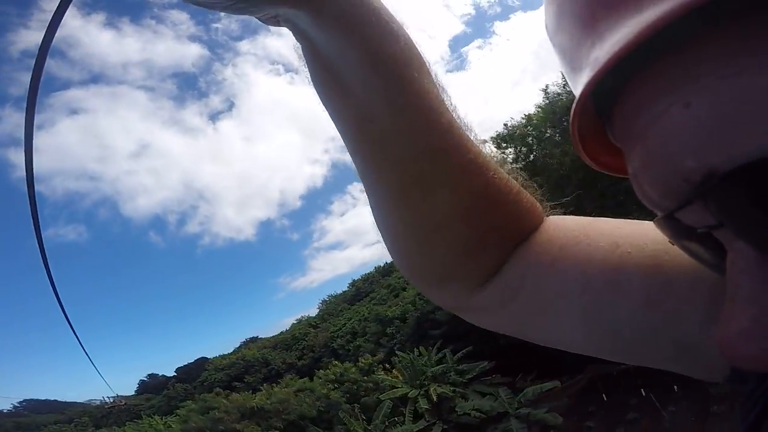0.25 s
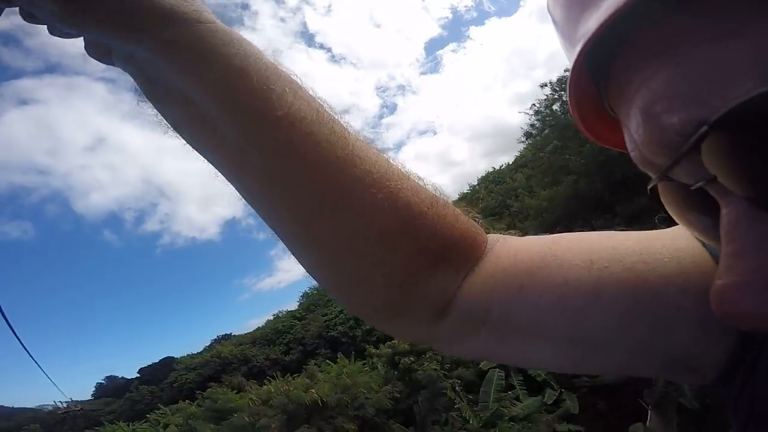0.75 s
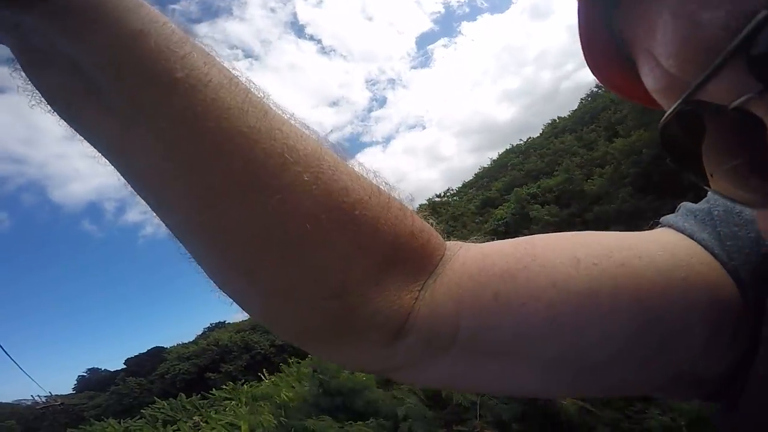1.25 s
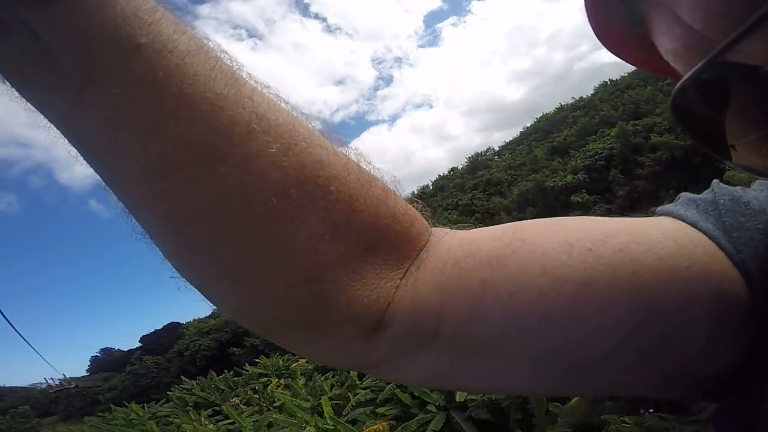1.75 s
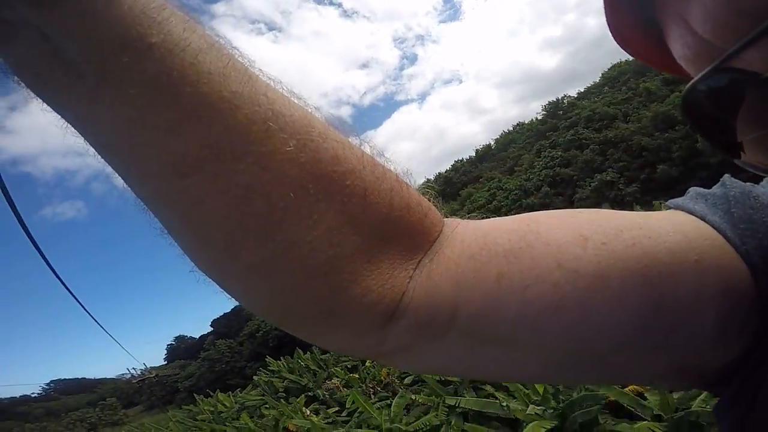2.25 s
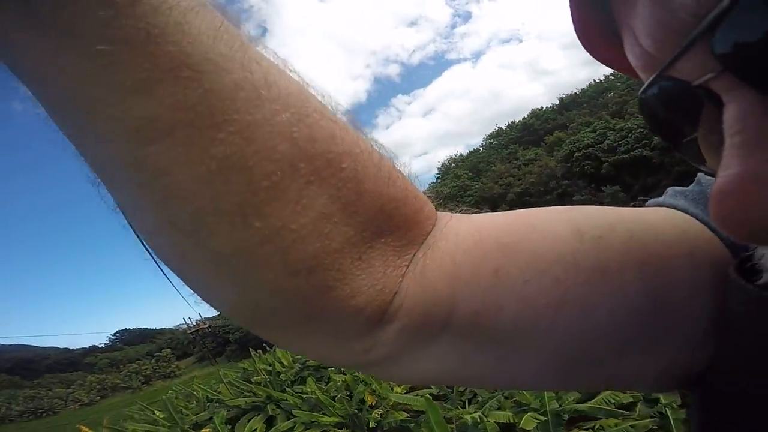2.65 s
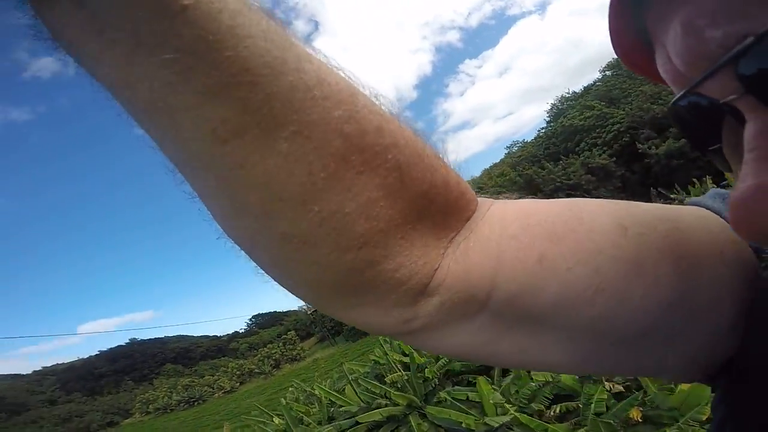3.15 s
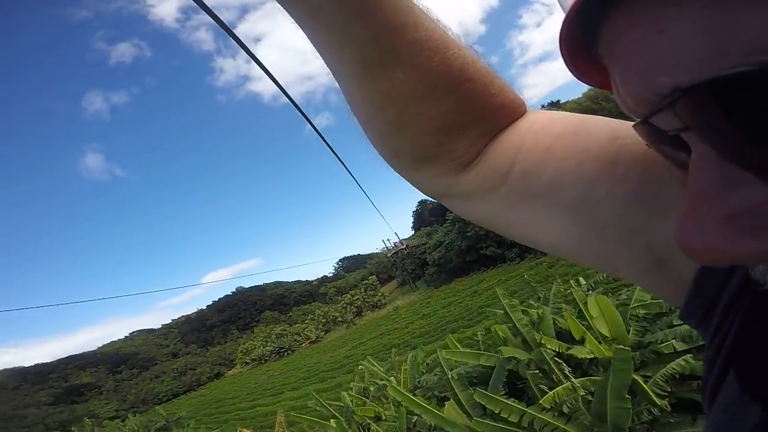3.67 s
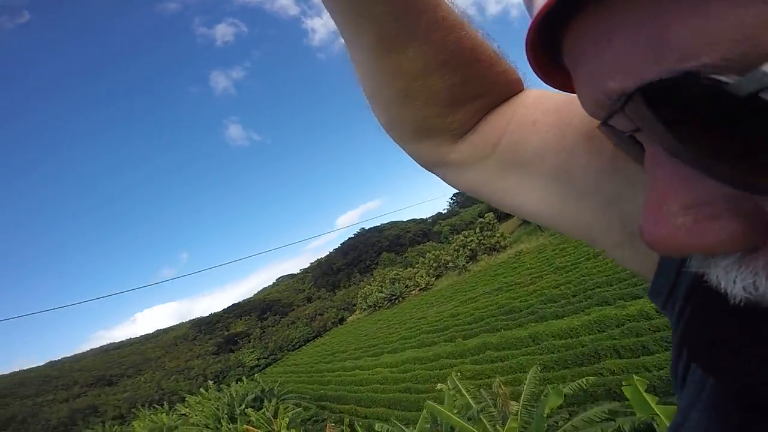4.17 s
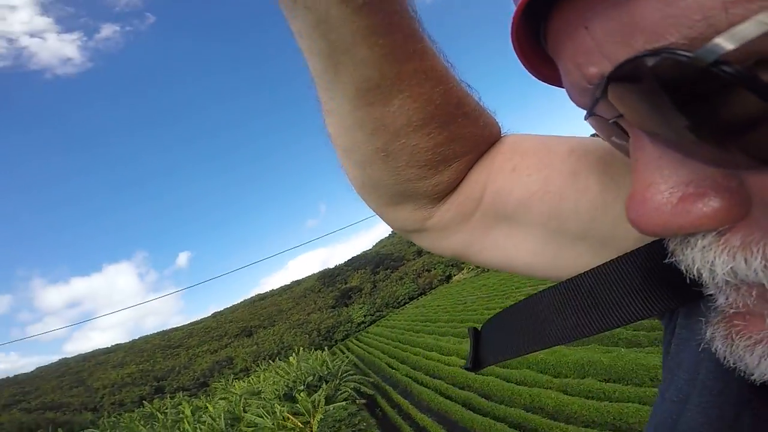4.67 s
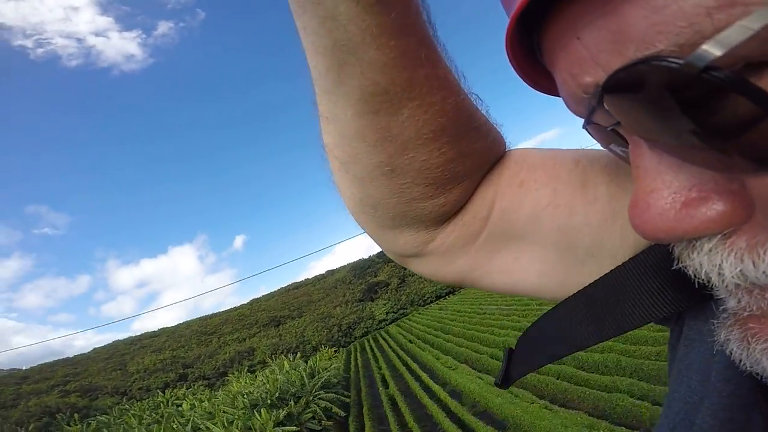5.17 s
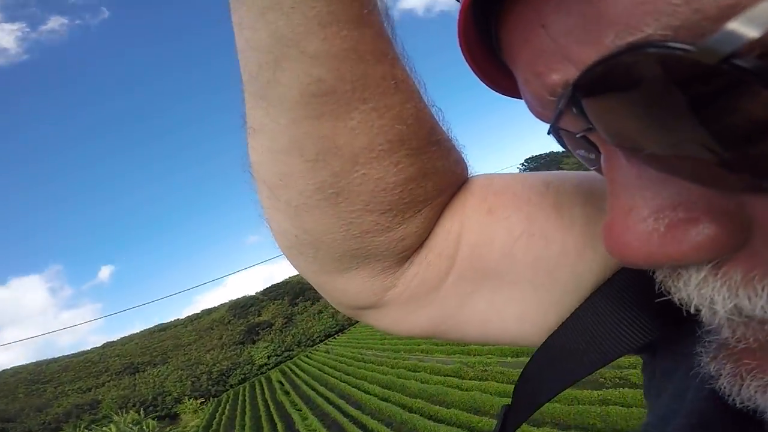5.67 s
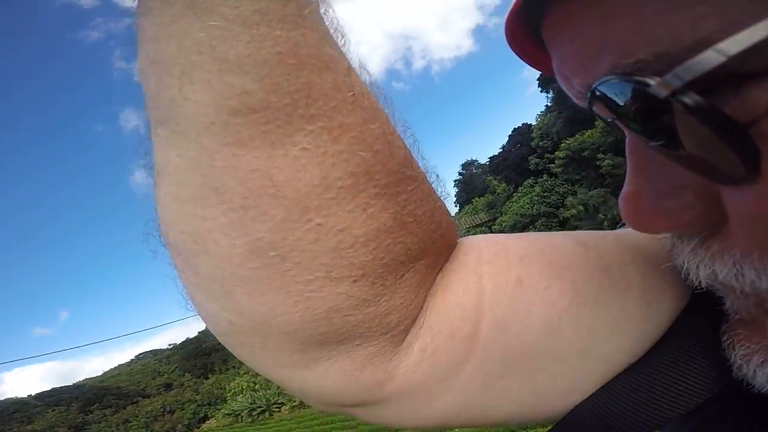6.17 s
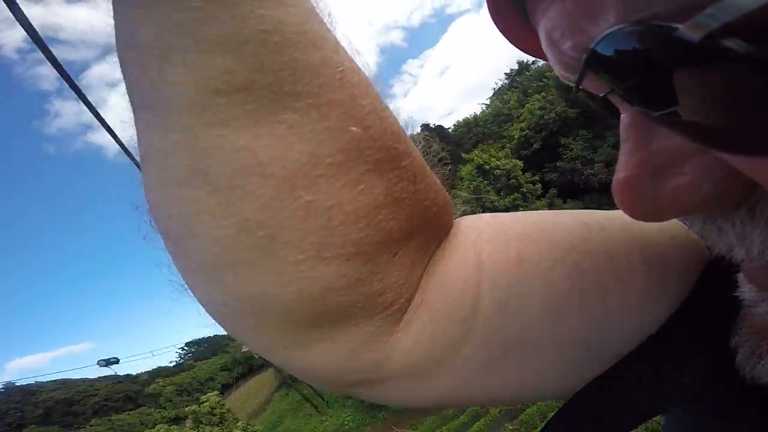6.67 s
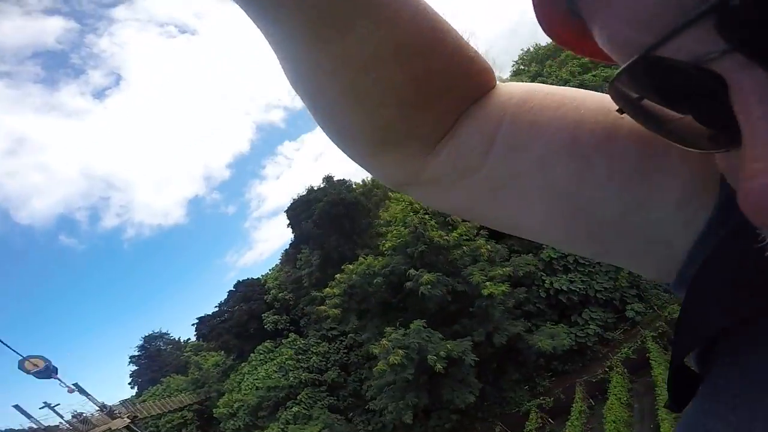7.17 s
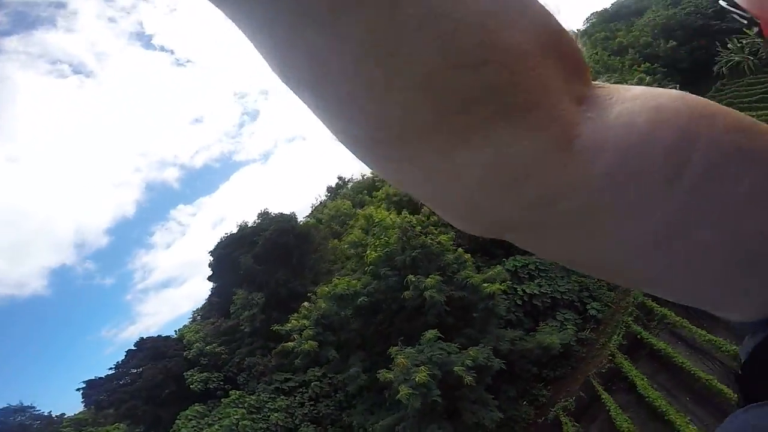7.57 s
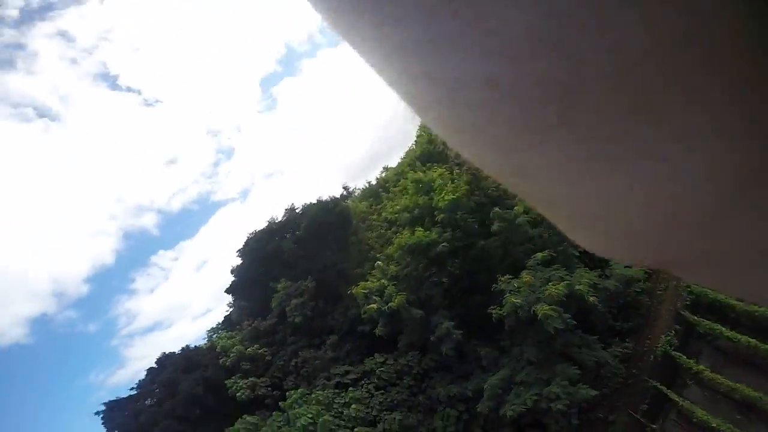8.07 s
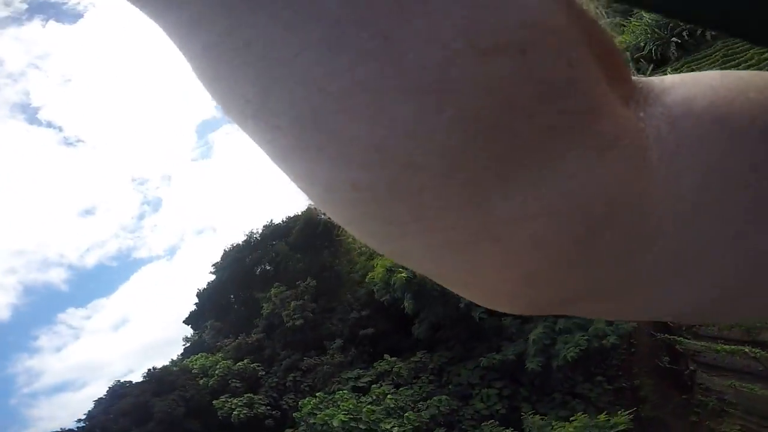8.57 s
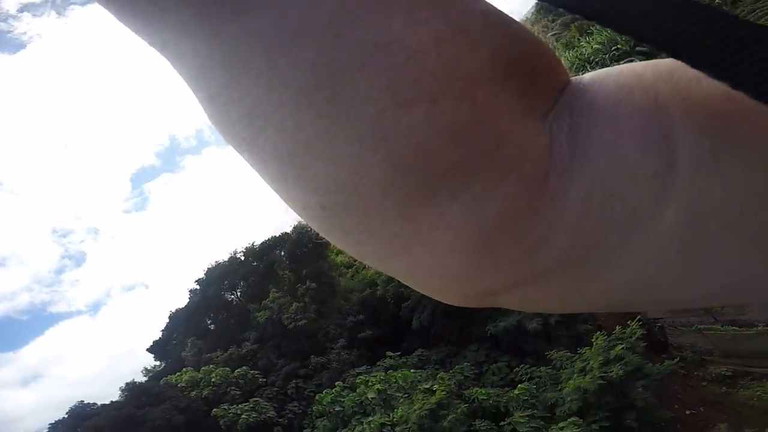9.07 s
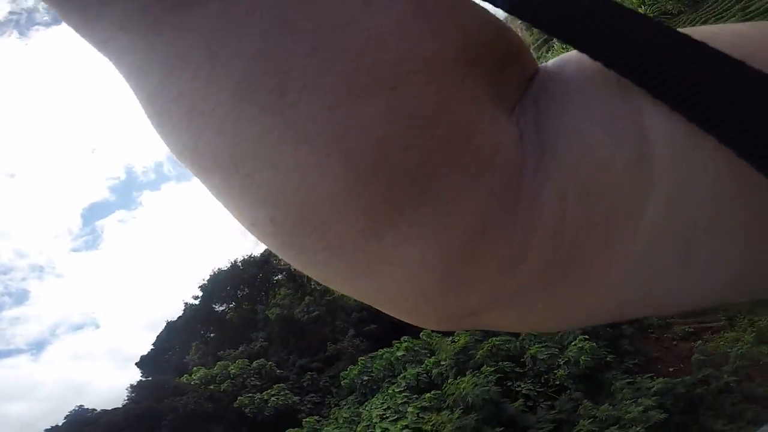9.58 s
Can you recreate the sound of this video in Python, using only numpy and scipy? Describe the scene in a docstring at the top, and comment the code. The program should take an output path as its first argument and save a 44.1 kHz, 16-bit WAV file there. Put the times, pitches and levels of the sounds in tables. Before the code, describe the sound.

Bright metallic rolling rush of a cable trolley with deep wind rumble, ending in a short brake scrape, a violent clack and scattered clunks.

```python
"""Trolley ride down a steel cable

Rough wire shakes the trolley's frame, the wheels whine over the strands, and single resonances sing out.
The trolley meets the brake block, which scrapes and jolts; knocks ring the microphone's housing.
At the stop the riding sounds drop in level, then slowly come back; the slack cable hums near the end.
Behind it all, wind buffets the microphone.
Rings are resonances or fading sines, rubbing and wind are shaped noise, whine and hum are sines.
"""
import sys
import numpy as np
from scipy import signal
from scipy.fft import rfft, irfft
from scipy.io import wavfile
from scipy.ndimage import uniform_filter1d

SR = 44100
rng = np.random.default_rng(int(sys.argv[2]) if len(sys.argv) > 2 else 0)


def to_wav(s):
    """Save 16-bit WAV."""
    ch = np.atleast_2d(s).T  # columns
    pcm = np.round(np.clip(ch, -1, 1) * 32767)  # PCM
    wavfile.write(sys.argv[1], SR, pcm.astype(np.int16))


N = 433503   # length in samples

# Loudness of the rolling, before the drop in level at the stop: (time [s], level [dB])
ROLLING_LEVEL = [(0.0, -21.5), (1.12, -19), (2.4, -22.5), (2.77, -20), (3.74, -22.5), (4.3, -21.5),
                 (4.9, -20), (5.32, -18.5), (5.85, -21.5), (6.5, -21), (7.11, -23), (7.76, -23)]
# Resonances of strap, plates, axles, wheels, clip and rims, one list a part:
# (pitch [Hz], width before widening [Hz], level within the part [dB])
FRAME_PARTS = [
    [(1640, 435, -6), (2030, 770, -6), (2350, 240, 0.5)],
    [(2730, 240, 0.5), (2913, 120, 2.5), (2555, 330, -2)],
    [(3482, 89, -7.5), (4034, 168, -2), (4225, 94, -1), (4620, 350, -4.5), (5206, 260, -7)],
    [(5616, 150, 3.5), (6214, 680, 0.5), (6720, 300, -12)],
    [(7420, 440, 4), (8280, 190, 0.5), (8650, 500, 1), (7130, 250, 0)],
    [(10670, 830, 11.5), (8750, 1800, -15), (12460, 390, 3.5), (13200, 730, 1), (15500, 1300, -1.5)],
]
# Narrow dips cut into the rolling: (pitch [Hz], width [Hz], depth [dB])
ROLLING_DIPS = [(3250, 200, -10), (3730, 160, -9), (5350, 150, -6), (5900, 110, -8)]


def rolling(flicker_db, swell_db):
    """Rough wire shakes every resonance; each swells on its own, a wobbling wheel flickers them all."""
    out = 0
    wobble_db = flicker_db * drift(40)
    shakes = rng.standard_normal((2, N))   # neighbouring resonances move unrelated
    for share_db, modes in zip(facing(), FRAME_PARTS):
        part = 0
        for k, (hz, width_hz, db) in enumerate(sorted(modes)):
            ring = narrow(shakes[k % 2], hz, 1.5 * width_hz)
            part = part + from_db(db + swell_db * drift(2.4)) * ring
        out = out + from_db(share_db + wobble_db) * rms_one(part)
    for hz, width_hz, depth_db in ROLLING_DIPS:
        out = out - (1 - from_db(depth_db)) * resonance(out, hz, width_hz)
    return from_db(*in_time(ROLLING_LEVEL)) * out


# The rider turns and other parts face the microphone; each row holds until the next:
# (time [s], then level [dB] of strap, plates, axles, wheels, clip, rims, wind flutter, wind rush, wind hiss)
RIDER_TURNS = [(0, -15, -7.5, -3.5, -5.5, -13, -10.5, 0, 1.5, -1),
               (1.9, -11, -6.5, -6, -6, -11, -8, 3.5, 0.5, -3),
               (2.63, -11, -8, -6, -7, -10, -6, 1.5, 0, -2.5),
               (3.28, -11, -6.5, -6, -7, -14.5, -12.5, 0.5, 0.5, -3.5),
               (3.8, -13, -8, -6, -5.5, -17, -10, 3.5, 0.5, -4.5),
               (4.419, -13.5, -12, -4, -4.5, -14, -10, 1, -5.5, -10),
               (5.93, -18.5, -8, -9.5, -11.5, -19, -13.5, -3, 1, -4),
               (6.85, -17.5, -8.5, -10, -11, -20, -14.5, -3, -1, -5),
               (7.9, -4, -6, -2, -5.5, -15, -12, -7, 1, -6),
               (8.75, -5.5, -11, -0.5, -7, -13.5, -13, -12.5, 0.5, -10.5)]
TURN_S = 0.11   # a turn takes this long


def facing():
    """A turn slides each level smoothly from one held value to the next."""
    s, *columns = np.transpose(RIDER_TURNS)
    held = np.searchsorted(s[1:], np.arange(N) / SR)
    return [uniform_filter1d(c[held], size=int(TURN_S * SR), mode="nearest") for c in columns]


# How fast the wheels cross the strands: (time [s], strands per second [Hz])
STRAND_RATE = [(.8, 873), (1.5, 858), (2.2, 830), (2.5, 812), (2.9, 801), (3.2, 765), (4.3, 748),
               (4.5, 726), (5.1, 705), (5.8, 676), (6.3, 660)]
# A multiple of that rate is heard while it crosses one of these: (pitch [Hz], width [Hz], level [dB])
WHINE_RESONANCES = [(1390, 108, -40.5), (1617, 73, -41), (1715, 75, -48), (2135, 80, -44), (2350, 155, -30),
                    (2637, 60, -35)]
# Stretches where the whine fades away: (from [s], to [s]); where from comes after to, the whine only dips a
# little between them
WHINE_SILENT = [(1, 0.73), (3.5, 4.15), (6.15, 11)]
WHINE_FADE_S = 0.17


def whine(waver_hz):
    """Second to fourth multiple of the strand rate, slightly unsteady, heard through resonances they cross."""
    t = np.arange(N) / SR
    per_s = in_time(STRAND_RATE)[0] + waver_hz * drift(32.4)
    heard = np.ones(N)
    for start, end in WHINE_SILENT:
        heard = heard * np.clip(np.maximum(start - t, t - end) / WHINE_FADE_S, 0, 1)
    out = 0
    for multiple in range(2, 5):
        hz = multiple * per_s
        through = 0
        for peak_hz, width_hz, db in WHINE_RESONANCES:
            through = through + from_db(db) / (1 + (2 * (hz - peak_hz) / width_hz) ** 2)
        out = out + through * tone(hz, 0, waver_db=1.5)
    return heard * out


# Single resonances that stand out for a while as rider and gear turn, before the drop in level at the stop:
# (start time [s], end time [s], pitch [Hz], width of each of two passes [Hz], level when fully fed [dB])
SINGING_RESONANCES = [(-.2, 0.56, 870, 130, -38.5), (.1, 1.47, 2750, 149, -29.5),
                      (.9, 3.18, 4100, 199, -30.5), (2.1, 3.3, 696, 200, -37.5),
                      (2.45, 2.7, 2390, 120, -33.5), (3.24, 3.7, 2875, 200, -28),
                      (4.3, 5.7, 2287, 146.4, -36.5), (4.45, 5.95, 463, 70, -47.5),
                      (6.6, 6.9, 162, 40, -44), (4.45, 5.95, 6200, 350, -26.5), (5.402, 6, 10780, 400, -29),
                      (6.2, 7.9, 7810, 260, -43.5), (7.2, 7.87, 2805, 200, -29),
                      (7.9, 9.8, 5600, 200, -29.5), (8.95, 9.9, 417, 120, -40),
                      (9.3, 10.2, 1044, 50.3, -55), (9.55, 10, 725, 40, -52), (8, 10.5, 14700, 700, -45),
                      (7.95, 9.3, 9150, 900, -36.5), (9.098, 9.9, 4180, 121.1, -30),
                      (9.3, 10, 2070, 250, -35.5)]


def singing(edge, waver_db):
    """Each resonance swells while air or wheels feed it; edge is the share of its time spent rising."""
    out, t = 0, np.arange(N) / SR
    for start, end, hz, width_hz, db in SINGING_RESONANCES:
        fed = np.clip(np.minimum(t - start, end - t) / (edge * (end - start)), 0, 1)
        ring = rms_one(narrow(rng.standard_normal(N), hz, width_hz))
        out = out + from_db(db + waver_db * drift(3.3)) * fed * ring
    return out


DROP_S, DROP_DB, PAUSE_S, RECOVER_DB_PER_S = 7.9, -17.5, 0.11, 11


def riding_level():
    """Level of the riding sounds: full, dropping at once at the stop, then climbing back steadily (dB)."""
    since = np.arange(N) / SR - DROP_S
    return (since > 0) * (DROP_DB + RECOVER_DB_PER_S * np.maximum(since - PAUSE_S, 0))


# The brake block catches and slips:
# (time [s], scrape level before trim [dB], ring of the rims before trim [dB])
BRAKE_SLIPS = [(7.7732, -4.5, -1), (7.776, -17, -8), (7.7983, -6, -20), (7.804, -4.5, -6),
               (7.8164, -4, -12), (7.825, -5.5, -8), (7.8534, 1, -6)]
# Colour of the scraping block: (pitch [Hz], relative level per hertz [dB])
BLOCK_COLOUR = [(240, -4), (400, -5.5), (1120, -12), (2920, 2), (3250, -9), (4350, -5), (6380, -7),
                (7670, -16.5), (10400, -16.5), (15500, -24)]
# Colour of the ringing wheel rims: (pitch [Hz], relative level per hertz [dB])
RIM_COLOUR = [(6000, -30), (8500, -5), (11000, 5), (13000, -9), (15500, -8)]
STEADY_RUB = (7.775, -13.5, 1)   # under the catches: time (s), level before trim (dB), time to fade 60 dB (s)
SLIP_T60_S = 0.049   # time for a slip to fade 60 dB


def brake(chatter_db, lift_s):
    """The block rattles as it scrapes, some catches ring the wheel rims, and it lifts off before the blow."""
    slips = [(s, db, SLIP_T60_S) for s, db, _ in BRAKE_SLIPS]
    rim_rings = [(s, db, 0.49 * SLIP_T60_S) for s, _, db in BRAKE_SLIPS]   # rims die sooner
    scrape = bursts(slips + [STEADY_RUB], BLOCK_COLOUR, trim_db=-11.5)
    rims = bursts(rim_rings, RIM_COLOUR, trim_db=-13.0)
    touching = np.clip((lift_s - np.arange(N) / SR) / 0.01, 0, 1)
    return touching * from_db(chatter_db * drift(150)) * (scrape + rims)


# Jolts of the harness around the braking, and one later:
# (time [s], level before its decay [dB], pitch [Hz], where minus swings the other way)
HARNESS_JOLTS = [(7.744, -17, 59), (7.781, -6.5, -58), (7.805, -9, 67), (7.809, 0, -39.5), (7.872, -13, 60),
                 (7.9248, -2.5, -150), (7.93, -13, 32.5), (8.562, -20, 49)]


def jolts():
    """Each jolt swings the microphone about one cycle."""
    out, t = np.zeros(N), np.arange(SR // 8) / SR
    for s, db, hz in HARNESS_JOLTS:
        dying = np.exp(-(0.93 * abs(hz) * t) ** 3)
        add(out, s, from_db(db) * np.sin(2 * np.pi * hz * t) * dying)
    return out


# Blows carried into the housing:
# (time [s], peak of the ring [dB], centre of the blow [Hz], spread [octaves], thud level before decay [dB])
BLOWS = [(1.104, -16.5, 250, .5, -8), (3.260, -13, 252, 0.44, -22), (3.271, 1.5, 398, 1.28, -7),
         (7.923, 0, 300, 2.8, -3), (7.995, -37, 500, .6, -40), (8.024, -33.5, 640, 0.79, -24),
         (8.142, -37, 500, 0.65, -42), (8.156, -38, 500, .6, -40), (8.2045, -7.5, 700, 1.8, -19),
         (8.249, -25.5, 600, 1.1, -44), (8.268, -37, 500, 0.56, -42), (8.328, -28, 496, .66, -42),
         (8.352, -9, 1246, 0.94, -26), (8.374, -21.5, 700, 1.1, -12), (8.697, -4.5, 526, 0.49, -7),
         (8.705, -11.5, 895, 0.81, -39), (8.847, -20.5, 404, 0.39, -15), (8.899, -12.5, 497, 1.3, -32),
         (8.917, -3.5, 550, 1.2, -7), (9.052, -13.5, 327, 0.53, -13), (9.082, -17.5, 325, 0.53, -7),
         (9.160, -24, 450, 0.48, -28), (9.279, -28, 420, .43, -34), (9.4, -29, 480, 0.27, -28),
         (9.471, -30, 600, 0.43, -19)]
# Ringing tones of the housing: (pitch [Hz], time to fade 60 dB before damping [s])
HOUSING_MODES = [(240, 0.05), (330, 0.037), (480, 0.04), (640, 0.033), (800, 0.032), (1050, 0.015),
                 (1290, 0.024), (1650, 0.024), (2300, 0.025), (2900, 0.05)]
DAMPING = 1.3   # hands and straps shorten the ring by this factor


def knocks(contact_s, thud_hz):
    """Each blow rings the housing modes near its centre, most treble dying sooner, while the body thuds."""
    out, t = np.zeros(N), np.arange(SR // 6) / SR
    luck = rng.normal(0, 2.25, (len(BLOWS), len(HOUSING_MODES)))   # dB, so that no two blows match
    for (s, db, centre_hz, octaves, thud_db), luck_db in zip(BLOWS, luck):
        ring = 0
        for k, ((hz, t60), own_db) in enumerate(zip(HOUSING_MODES, luck_db)):
            away = np.log2(hz / centre_hz) / octaves
            swing = (-1) ** k * np.sin(2 * np.pi * hz * t)   # every second mode starts the other way
            ring = ring + from_db(own_db - 4.1 * away ** 2) * swing * fading(t, t60 / DAMPING)
        ring = ring * (1 - np.exp(-t / contact_s))   # a soft contact builds up
        thud = np.sin(2 * np.pi * thud_hz * t) * fading(t, 0.1)
        add(out, s, from_db(db) * ring / np.abs(ring).max() + from_db(thud_db) * thud)
    return out


# Metal striking metal: (time [s], level before trim [dB], time to fade 60 dB [s])
METAL_CRACKS = [(7.9221, 10.5, 0.011), (8.2045, 1.5, 0.012)]
# Colour of struck steel: (pitch [Hz], relative level per hertz [dB])
STEEL_COLOUR = [(1200, 1), (3000, -7), (5000, 6.5), (7000, -5), (15500, -24)]


def cracks():
    """Metal on metal: very short bursts of bright noise."""
    return bursts(METAL_CRACKS, STEEL_COLOUR, trim_db=-5.0)


# Faint treble ticks: (time [s], level before trim [dB], time to fade 60 dB [s])
TREBLE_TICKS = [(3.51, -26, 0.025), (8.897, -25, 0.023), (9.18, -22, .04), (9.53, -20, 0.034),
                (9.797, -11, 0.022)]


def ticks():
    """Faint short bursts of treble noise, in the colour of the rims."""
    return bursts(TREBLE_TICKS, RIM_COLOUR, trim_db=-7)


# Tones of the humming cable: (multiple of its pitch [-], level added to the hum's own [dB])
HUM_TONES = [(1, 0.5), (2, -16)]
HUM_S, HUM_HZ, HUM_SAG_HZ_PER_S2 = 9.08, 181, 50   # start, first pitch, sag with the square of time
HUM_DB, HUM_GROWS_DB_PER_S = -41, 13.5


def hum():
    """The slack cable hums after the stop, in a tone and its overtone, sagging in pitch and growing."""
    since = np.maximum(np.arange(N) / SR - HUM_S, 0)
    hz = HUM_HZ - HUM_SAG_HZ_PER_S2 * since ** 2
    level_db = HUM_DB + HUM_GROWS_DB_PER_S * since
    tones = sum(tone(int(multiple) * hz, level_db + db, waver_db=1.5) for multiple, db in HUM_TONES)
    return np.clip(since / 0.033, 0, 1) * tones


# Wind on the microphone, before gusts, lumps and turns:
# (time [s], level of buffeting and flutter [dB], level of rush and hiss [dB])
WIND_LEVEL = [(0.0, -28, -38.5), (0.74, -26.5, -32), (1.37, -25, -36.5), (2.16, -27.5, -31.5),
              (3.26, -22.5, -33.5), (3.75, -26.5, -40), (4.3, -22, -38), (4.7, -21, -39), (5.3, -26, -40.5),
              (5.97, -19.5, -40.5), (6.27, -22.5, -38), (6.95, -25.5, -44.5), (7.45, -25.5, -43),
              (7.8, -20.5, -41.5), (7.97, -34, -56), (8.6, -35, -49.5), (8.8, -22.5, -40), (9.2, -24, -39),
              (9.83, -19.5, -35)]
# Colours of the wind, from deep to high, each: (pitch [Hz], relative level per hertz [dB])
BUFFET_COLOUR = [(18, -4), (30, -2.5), (50, 3), (65, -4.5), (110, -45)]
FLUTTER_COLOUR = [(45, -33), (65, 2.5), (95, 7.5), (115, -4.5), (150, -23), (250, -57.5)]
RUSH_COLOUR = [(90, -14.5), (130, 1), (180, -9), (280, -14.5), (420, -17.5), (650, -56)]
HISS_COLOUR = [(250, -22), (450, 4), (800, 5.5), (1100, -1), (1500, -11), (2200, -32)]


def wind(lumpy_db, gust_db):
    """Eddies break on the housing: buffeting and flutter, with a lumpier rush and hiss in step above."""
    low_db, high_db = in_time(WIND_LEVEL)
    flutter_db, rush_db, hiss_db = facing()[-3:]
    eddies_db = lumpy_db * drift(7.4)
    buffeting = from_db(low_db + gust_db * drift(3.5)) * noise(BUFFET_COLOUR)
    flutter = from_db(low_db + flutter_db + 0.5 * eddies_db) * noise(FLUTTER_COLOUR)
    rush = from_db(high_db + rush_db + eddies_db) * noise(RUSH_COLOUR)
    hiss = from_db(high_db + hiss_db + 1.15 * eddies_db) * noise(HISS_COLOUR)
    return buffeting + flutter + rush + hiss


def bursts(events, spectrum, trim_db):
    """Sudden noise that dies away, cut off after a quarter second."""
    envelope, t = np.zeros(N), np.arange(SR // 4) / SR
    for s, db, t60 in events:
        add(envelope, s, from_db(db + trim_db) * fading(t, t60))
    return envelope * noise(spectrum)


def tone(hz, db, waver_db):
    """A sine of moving pitch and unsteady rms level."""
    level = np.sqrt(2) * from_db(db + waver_db * drift(3.3))
    return level * np.sin(2 * np.pi * np.cumsum(hz) / SR)


def noise(spectrum):
    """Noise of a given spectrum, unit power."""
    hz, db = np.transpose(spectrum)
    grid = np.log(np.fft.rfftfreq(N, 1 / SR) + 1)   # + 1 avoids the log of zero
    shape = from_db(np.interp(grid, np.log(hz), db, left=-99, right=-99))
    return rms_one(irfft(rfft(rng.standard_normal(N)) * shape, N))


def resonance(x, hz, width_hz):
    """Two-pole resonance of gain 1 on top."""
    r = np.exp(-np.pi * width_hz / SR)
    feed = np.array([1, 0, -1]) * (1 - r * r) / 2
    return signal.lfilter(feed, [1, -2 * r * np.cos(2 * np.pi * hz / SR), r * r], x)


def narrow(x, hz, width_hz):
    """Twice through one resonance: steep skirts."""
    return resonance(resonance(x, hz, width_hz), hz, width_hz)


def drift(rate_hz):
    """Slow random wandering of spread 1, made at every 40th sample and joined by straight lines."""
    r = np.exp(-80 * np.pi * rate_hz / SR)
    steps = rng.standard_normal(N // 40 + 2002)
    slow = signal.lfilter([1], [1, -2 * r, r * r], steps)[2000:]   # drop the start-up
    return np.interp(np.arange(N) / 40, np.arange(len(slow)), rms_one(slow))


def in_time(rows):
    """Columns of a curve table, one value a sample."""
    s, *columns = np.transpose(rows)
    return [np.interp(np.arange(N) / SR, s, c) for c in columns]


def fading(t, t60):
    """Decay of 60 dB in t60."""
    return from_db(-60 * t / t60)


def from_db(db):
    """Decibels to gain."""
    return 10 ** (np.asarray(db) / 20)


def rms_one(x):
    """Scale to unit power."""
    return x / np.sqrt(np.mean(x ** 2) + 1e-20)


def add(out, s, sound):
    """Lay a sound into out at time s."""
    at = round(s * SR)
    out[at:at + len(sound)] += sound[:N - at]


def scene():
    """All sources at the one microphone."""
    wheels = rolling(flicker_db=0.72, swell_db=1.6) + whine(waver_hz=3.04) + singing(edge=0.13, waver_db=2.2)
    braking = brake(chatter_db=2.0, lift_s=7.908) + jolts()
    hits = knocks(contact_s=0.00076, thud_hz=43.6) + cracks() + ticks()
    background = hum() + wind(lumpy_db=1.5, gust_db=2.0)
    return (from_db(riding_level()) * wheels + braking + hits + background)[None]


CUTOFF_HZ = 15250


def record(dry):
    """The input overloads softly towards full scale, then a steep filter cuts the top."""
    squeezed = dry / (1 + np.abs(dry) ** 6) ** (1 / 6)
    low_pass = signal.ellip(12, .3, 70, CUTOFF_HZ, fs=SR, output="sos")
    return signal.sosfilt(low_pass, squeezed)


dry = scene()
out = record(dry)
to_wav(out)
```